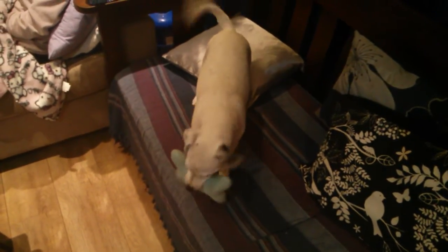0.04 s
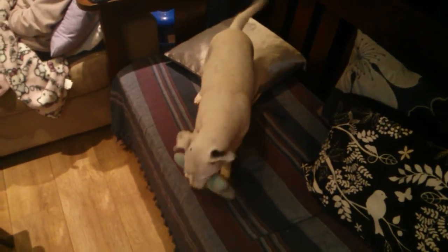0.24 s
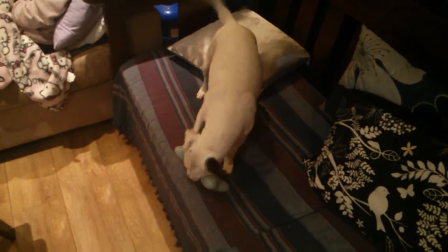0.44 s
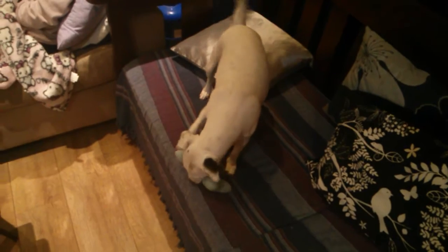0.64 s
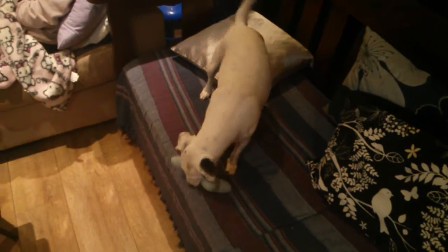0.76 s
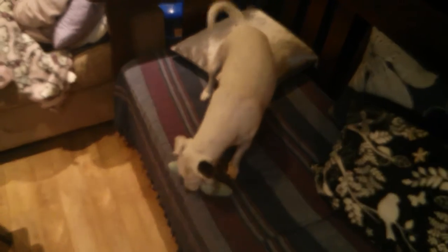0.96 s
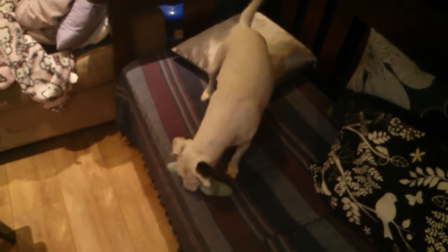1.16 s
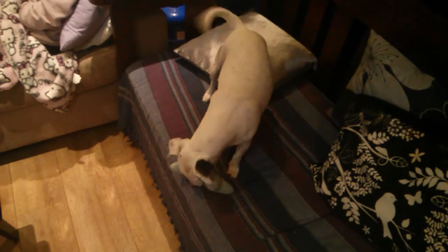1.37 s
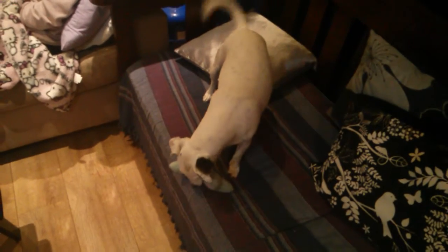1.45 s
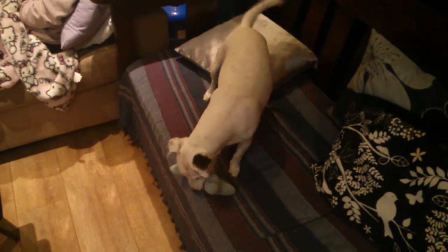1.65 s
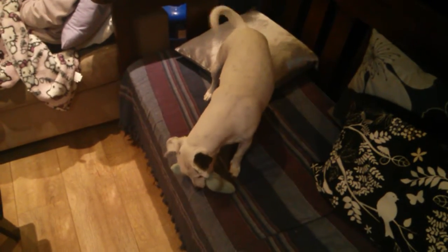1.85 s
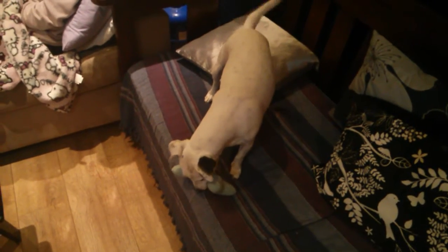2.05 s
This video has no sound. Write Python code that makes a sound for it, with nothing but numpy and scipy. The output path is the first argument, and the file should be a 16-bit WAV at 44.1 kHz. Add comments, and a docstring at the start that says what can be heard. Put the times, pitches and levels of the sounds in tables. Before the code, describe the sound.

A squeaky toy, bitten by a dog, gives a bright squeak that chokes into a rasp, then another rasp, two lower squeaks and a last bright one. Paws thump softly on a sofa, near one microphone in a quiet living room.

```python
"""A quiet living room, one small microphone near the sofa where a dog chews a squeaky toy.
A bite blows the toy's reed high and bright, then chokes it into a rasp; refilling, it sings lower.
Paws thump the cushion and plush rubs. The reed bursts open into a second rasp, and a dull puff follows.
One dry tick close to the microphone, two more refills among soft thumps, a quick run of ticks,
then a last bright squeak. The room rings briefly after each sound, over a faint rumble and hiss."""
import sys
import numpy as np
from scipy import signal
from scipy.fft import rfft, irfft, next_fast_len
from scipy.io import wavfile
from scipy.ndimage import map_coordinates

SR = 44100
rng = np.random.default_rng(int(sys.argv[2]) if len(sys.argv) > 2 else 0)


def unload_audio(sound):
    """Save the sound as a 16-bit wav file, at the path given as the first command line argument."""
    columns = np.transpose(np.atleast_2d(sound))
    # keep every value between -1 and 1, then stretch to whole-number steps
    steps = np.round(np.clip(columns, -1, 1) * 32767)
    wavfile.write(sys.argv[1], SR, steps.astype(np.int16))


N = 92610
T = np.arange(N) / SR

# Air bitten out of the toy, and drawn back in: t/s, rise/s, hold/s, fall/s, f/Hz, level/dB,
# scoop, sag and flutter (shares of the pitch), air/dB, slit whistle/dB
BITES = [(0.092, .015, 0.0087, 0.023, 1346, -32.5, .09, .14, 0.0038, -22, -23.5),
         (1.76, 0.02, 0.0056, .052, 1407, -33, 0.14, .18, 0.015, -29, -13)]
INTAKES = [(0, 0.001, 0.0079, 0.06, 971, -66, -0.011, 0.072, 0.038, 5.5, 0),
           (.293, 0.01, 0.0015, 0.018, 985.4, -52.5, .02, .04, 0.029, 3, -11),
           (.874, 0.014, 0.0042, 0.0157, 1091, -40.5, -0.031, 0.092, 0.022, -8, -10),
           (1.185, .023, .005, 0.025, 1071, -36.5, .01, .14, 0.0072, -19.5, -7)]
# Spectra of the reed blown out, the reed drawn in, and the air rushing past: f/Hz, level/dB
BITE_SPECTRUM = [(1350, -3), (2700, -10.5), (4100, -8), (5500, -3.5), (6900, -8.5), (8200, -4.5),
                 (9600, 3.5), (11000, -8), (12300, -19.5), (15000, -29)]
INTAKE_SPECTRUM = [(1050, -2.5), (2100, -10), (3200, -17.5), (4250, -14.5), (5300, -17), (6400, -25),
                   (7500, -17.5), (8500, -15), (9700, -1), (10700, -9.5), (11800, -20.5), (15000, -40)]
AIR_SPECTRUM = [(200, -22.5), (650, -17.5), (1000, 1.5), (1450, -9), (2000, 4), (2600, -11), (3100, -5.5),
                (3700, -16), (5100, -5.5), (6500, -18.5), (8000, -12), (10000, -3.5), (11200, -13),
                (13000, -23), (16000, -36.5)]
# Bites that choke the reed: t/s, rise/s, hold/s, fall/s, slap rate/Hz, scatter/periods, level/dB, ring/dB
HARD_BITES = [(0.1332, 0.0042, .007, 0.022, 640, 0.17, -27.5, -4.5),
              (0.592, 0.008, 0.0034, 0.018, 430, .08, -29, -23.5)]
# Spectrum of the rasp: f/Hz, level/dB
RASP_SPECTRUM = [(100, -28.5), (200, 0.5), (400, -10.5), (750, -5.5), (1200, -1.5), (1900, 2), (3200, -7),
                 (5000, -2.5), (7500, -6), (9200, -4), (11000, -3), (12500, -20.5), (15500, -29)]
# Resonances of the reed: f/Hz, width/Hz, level/dB
REED_MODES = [(1850, 260, -4), (5360, 67, -9), (8920, 400, 6)]
# Paws landing on the cushion: t/s, level/dB
PAW_STEPS = [(.388, -47), (0.43, -58.5), (.49, -59), (.668, -54), (.722, -62), (.93, -58), (1.375, -60.5)]
# Resonances of the sofa: f/Hz, level/dB, t60/s
SOFA_MODES = [(58, -22.5, 0.3), (102, -7, 0.2), (140, 4.5, .06), (230, 0, .07)]
# Plush brushing the cover: t/s, half length/s, level/dB
PLUSH_RUBS = [(0.433, 0.016, -69.5), (1.001, .01, -69), (1.33, 0.006, -67.5)]
# Spectra of the plush and of the escaping air: f/Hz, level/dB
PLUSH_SPECTRUM = [(500, -15), (3000, -7.5), (4800, 2), (6500, -16.5), (15000, -14.5)]
PUFF_SPECTRUM = [(150, -13.5), (800, -17), (1500, -3), (2500, -17), (15000, -29)]
# Ticks at the microphone: t/s, level/dB, rebound/dB, crack/dB
CLOSE_TICKS = [(.858, -47, -26, -28), (1.5316, -40, -5.5, -12.5), (1.5419, -43, -5, -14.5),
               (1.5518, -45.5, -9, -19.5), (1.563, -53, -6, -22.5), (1.571, -56, 2, -22)]
# Background rumble and hiss: f/Hz, level/dB
FLOOR_SPECTRUM = [(25, -5.5), (60, -3), (110, 1.5), (170, -3.5), (230, 0), (310, -3), (400, -19),
                  (700, -21), (1500, -23), (3200, -27.5), (5500, -21.5), (7500, -26.5), (10000, -25),
                  (15500, -15.5)]
# Decay of the living room: f/Hz, t60/s
ROOM_DECAY = [(150, 0.55), (800, 0.22), (2000, .32), (5500, 0.28), (10000, 0.28), (15000, 0.27)]


def amp(db):
    """Decibels to gain."""
    return 10 ** (np.asarray(db) / 20)


def unit(x):
    """Scale to rms 1."""
    return x / np.sqrt(np.mean(x ** 2) + 1e-20)


def along(points, hz):
    """Read (f/Hz, value) points on a log frequency axis."""
    f, values = np.transpose(points)
    return np.interp(np.log(hz + 1), np.log(f + 1), values)


def filtered(x, response):
    """Pass x through a frequency response."""
    size = next_fast_len(N + SR // 2)
    return irfft(rfft(x, size) * response(np.fft.rfftfreq(size, 1 / SR)), size)[:N]


def coloured(x, spectrum):
    """x shaped by a spectrum, at rms 1."""
    return unit(filtered(x, lambda hz: amp(along(spectrum, hz))))


def noise(spectrum):
    """Noise with this spectrum, at rms 1."""
    return coloured(rng.standard_normal(N), spectrum)


def wobble(t, knots_per_s):
    """A smooth random curve, read at times t."""
    return map_coordinates(rng.standard_normal(N // 4), [t * knots_per_s], mode="wrap")


def stroke(start, rise, hold, fall):
    """Progress 0-1 of the rise and of the fall of one push of air."""
    return np.clip((T - start) / rise, 0, 1), np.clip((T - start - rise - hold) / fall, 0, 1)


def squeak(start, rise, hold, fall, hz, db, scoop, sag, flutter, air_db, slit_db, spectrum):
    """The reed sings over a hiss of air: more pressure makes it louder, higher, steadier and brighter."""
    slit_hz, slit_width_hz = 9750, 930  # breathy whistle in the reed's slit
    up, down = stroke(start, rise, hold, fall)
    on = (up > 0) & (down < 1)
    pressure = np.sin(np.pi / 2 * up) * (1 - down) ** 1.21  # drops fast, then lingers
    unsteady = flutter * (1 + down) * wobble(T, knots_per_s=450)
    pitch = hz * (1 - scoop * (1 - up) ** 2 - sag * down + unsteady)[on]
    harmonic = np.arange(1, 15)[:, None]
    phases = 2 * np.pi * (harmonic * np.cumsum(pitch) / SR + rng.random(harmonic.shape))
    gains = amp(along(spectrum, harmonic * pitch)) / np.linalg.norm(amp(along(spectrum, harmonic * hz)))
    flicker = amp(2.5 * wobble(T[on] + harmonic, knots_per_s=220))
    swell = pressure[on] ** (0.46 + 0.3 * np.log2(harmonic))  # high overtones need more pressure
    out = amp(air_db) * pressure * noise(AIR_SPECTRUM)
    slit = filtered(rng.standard_normal(N), lambda f: np.exp(-0.5 * ((f - slit_hz) / slit_width_hz) ** 2))
    out += amp(slit_db) * (up * pressure) ** 2 * unit(slit)
    out[on] += np.sqrt(2) * np.sum(gains * flicker * swell * np.sin(phases), axis=0)
    return amp(db) * out


def toy_hollow(x, t60=0.021):
    """Sound bounces inside the toy for a few milliseconds and smears."""
    t = T[:SR // 20]
    return signal.fftconvolve(x, rng.standard_normal(len(t)) * amp(-60 * t / t60))[:N]


def reed_response(f):
    """The reed's resonances, each a band-pass peak."""
    return sum(amp(db) * 1j * f * width / (hz ** 2 - f ** 2 + 1j * f * width)
               for hz, width, db in REED_MODES)


def rasps(air_db=-4):
    """Overblown, the reed slaps unevenly in a gush of air and rings its own resonances."""
    out = np.zeros(N)
    for start, rise, hold, fall, slap_hz, scatter, db, ring_db in HARD_BITES:
        jitter, force = rng.standard_normal((2, N // 20))
        slap_s = start + (np.arange(len(jitter)) + scatter * jitter) / slap_hz
        at = np.round(slap_s * SR).astype(int)
        slaps = np.bincount(at[at < N], amp(2 * force)[at < N], N)
        drive = unit(toy_hollow(slaps - slaps.mean())) + amp(air_db) * rng.standard_normal(N)
        ring = amp(ring_db) * unit(filtered(drive, reed_response))
        up, down = stroke(start, rise, hold, fall)
        pressure = (up > 0) * (0.5 + 0.5 * up) * (1 - down) ** 2  # the reed chokes at half pressure
        out += amp(db) * pressure * (coloured(drive, RASP_SPECTRUM) + ring)
    return out


def paws(rise_s=0.0026):
    """Soft steps on the cushion shake the sofa's low resonances."""
    out = np.zeros(N)
    for start, db in PAW_STEPS:
        t = np.maximum(T - start, 0)
        attack = 1 - np.exp(-(t / rise_s) ** 2)
        sofa = sum(amp(mode_db - 60 * t / t60) * np.sin(2 * np.pi * hz * t)
                   for hz, mode_db, t60 in SOFA_MODES)
        out += amp(db) * attack * sofa
    return out


def rubs():
    """The toy's plush brushes faintly against the sofa cover."""
    swell = sum(amp(db) * np.exp(-((T - peak_s) / half_s) ** 2) for peak_s, half_s, db in PLUSH_RUBS)
    return swell * noise(PLUSH_SPECTRUM)


def reed_pop(start=0.5902, length_s=0.0042, hz=1184, db=-23.5):
    """The reed bursts open at the head of the second hard bite."""
    t = np.clip(T - start, 0, length_s)
    return amp(db) * np.sin(np.pi * t / length_s) ** 2 * np.sin(2 * np.pi * hz * t)


def puff(peak_s=0.67, half_s=0.0061, db=-46.5):
    """A little air escapes, dull and short, after the second hard bite."""
    return amp(db) * np.exp(-((T - peak_s) / half_s) ** 2) * noise(PUFF_SPECTRUM)


def ticks(end_hz=3610, glide_hz=3430, glide_s=0.00082, rise_s=0.00054, knock_hz=1255, rebound_s=0.0039):
    """Tiny dry ticks next to the microphone: each chirps down and rebounds once."""
    out = np.zeros(N)
    for start, db, rebound_db, crack_db in CLOSE_TICKS:
        t = np.maximum(T - start, 0)
        cycles = end_hz * t + glide_hz * glide_s * (1 - np.exp(-t / glide_s))
        envelope = (t / rise_s * np.exp(1 - t / rise_s)) ** 2
        crack = rng.standard_normal(N) + np.sin(2 * np.pi * knock_hz * t)
        tick = amp(db) * envelope * (np.sin(2 * np.pi * cycles) + amp(crack_db) * crack)
        out += tick + amp(rebound_db) * np.interp(T - rebound_s, T, tick)
    return out


def room(x, early_db=-2.5, early_t60=0.11, tail_db=-3.5, delay_s=0.003):
    """The direct sound, quick echoes off floor and furniture, then a tail whose bass lasts longest."""
    hz, frame_s, bands = signal.stft(rng.standard_normal(SR // 2), SR, nperseg=256)
    decay = amp(-60 * frame_s / along(ROOM_DECAY, hz)[:, None])
    tail = signal.istft(bands * decay, SR, nperseg=256)[1]
    t = T[:len(tail)]
    early = rng.standard_normal(len(t)) ** 3 * amp(-60 * t / early_t60)  # cubed into sparse spikes
    echoes = amp(tail_db) * tail / np.linalg.norm(tail) + amp(early_db) * early / np.linalg.norm(early)
    return x + signal.fftconvolve(x, np.pad(echoes, (int(delay_s * SR), 0)))[:N]


def scene(tick_room_db=-9, floor_db=-67):
    """Toy and paws reach the microphone from the sofa, each by its own echoes; the ticks are closer."""
    sources = [squeak(*row, BITE_SPECTRUM) for row in BITES]
    sources += [squeak(*row, INTAKE_SPECTRUM) for row in INTAKES]
    sources += [rasps() + reed_pop() + puff(), paws() + rubs()]
    from_sofa = sum(room(x) for x in sources)
    close = ticks()
    floor = amp(floor_db) * noise(FLOOR_SPECTRUM)
    return (from_sofa + close + amp(tick_room_db) * room(close) + floor)[None]


def record(dry, low_cut_hz=22, top_hz=15900):
    """The small mono microphone thins the deep bass; nothing is kept above the band limit."""
    return filtered(dry[0], lambda hz: (1j * hz / (1j * hz + low_cut_hz)) ** 2 * (hz < top_hz))[None]


dry = scene()
out = record(dry)
unload_audio(out)
```